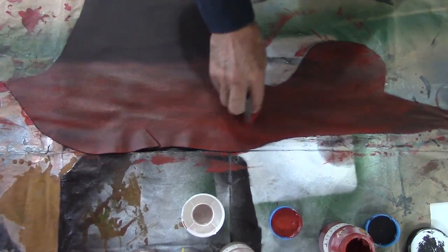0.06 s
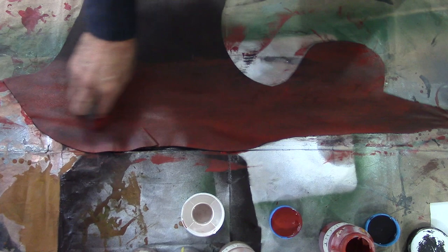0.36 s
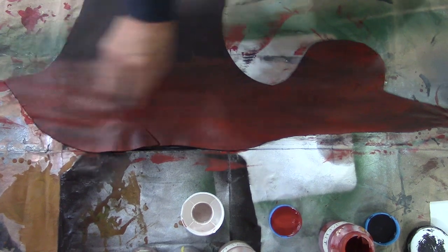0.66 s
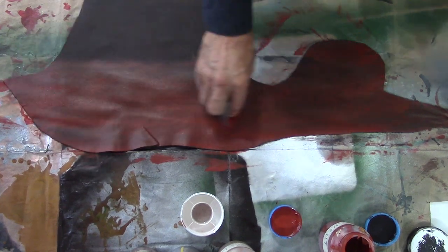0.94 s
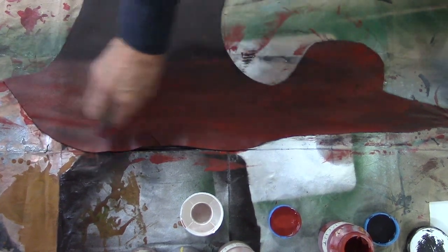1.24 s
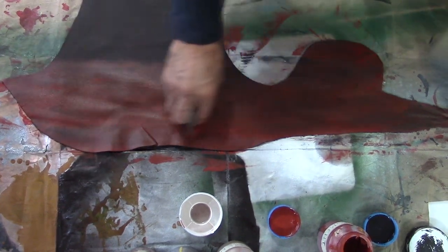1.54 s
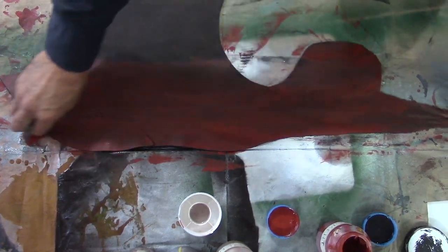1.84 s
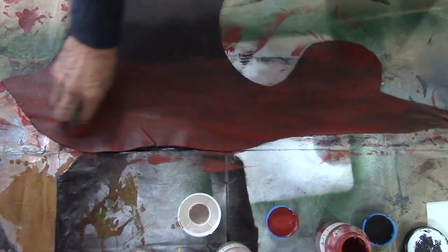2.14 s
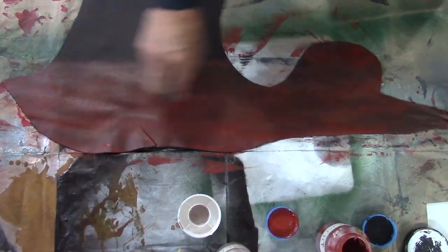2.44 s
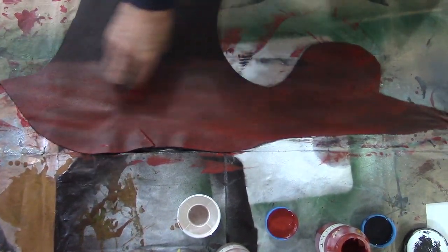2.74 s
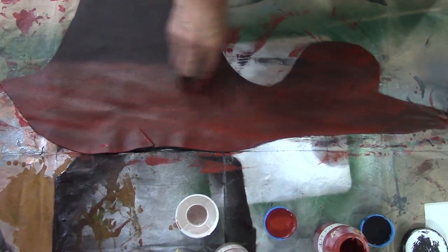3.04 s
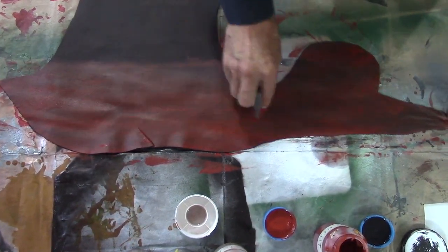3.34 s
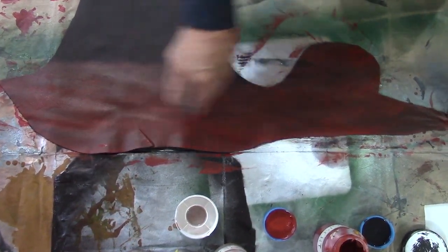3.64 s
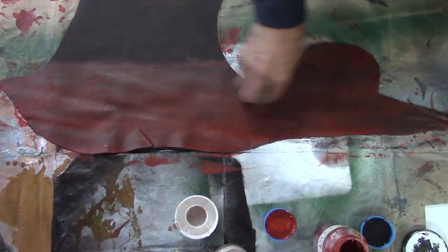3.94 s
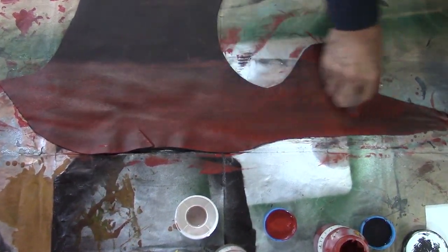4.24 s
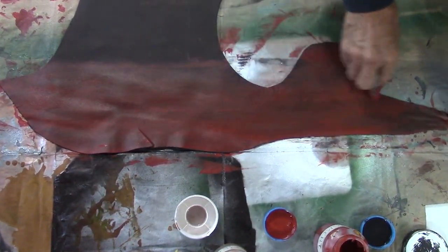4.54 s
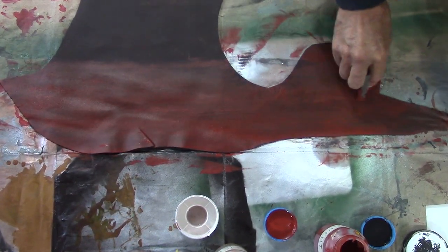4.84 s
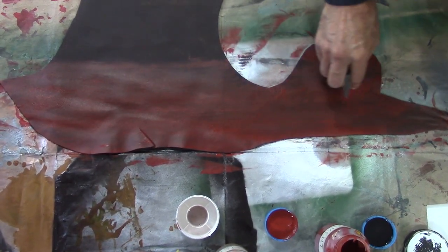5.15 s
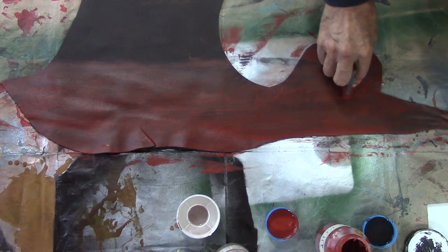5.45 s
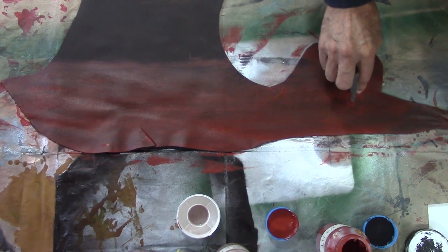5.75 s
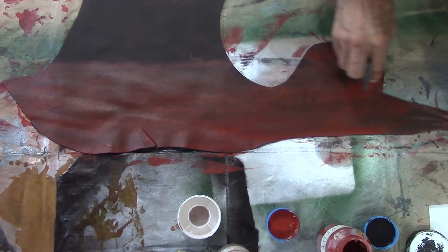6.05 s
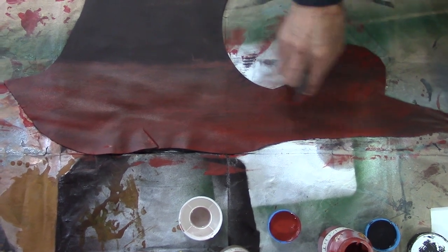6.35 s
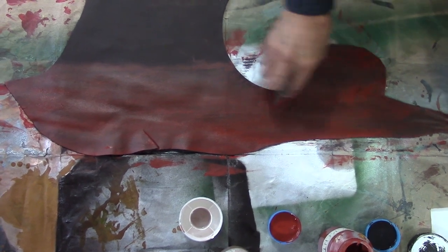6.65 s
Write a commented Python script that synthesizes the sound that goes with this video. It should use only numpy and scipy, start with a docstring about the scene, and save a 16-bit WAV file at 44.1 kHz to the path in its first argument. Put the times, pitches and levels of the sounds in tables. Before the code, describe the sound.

A pad rasps over leather in quick strokes, with small squeaks, a few sharp ticks and a hand thumping on a workbench.

```python
"""A hand rubs colour into a hide on a workbench, in a small workshop with quiet room noise.
First come long strokes: the pad rasps over the grain and squeaks where it drags hardest,
among one faint tick and two sharp ones. From 2 s the strokes are short, and hard landings of the
hand thump the bench and ring its modes. After 5 s the strokes pause for light fingertip scuffs
and fading thumps; two softer strokes and a faint tick follow after 6 s."""
import sys
import numpy as np
from scipy import signal
from scipy.fft import rfft, irfft
from scipy.io import wavfile

SR = 44100
rng = np.random.default_rng(int(sys.argv[2]) if len(sys.argv) > 2 else 0)


def unload_audio(sound):
    """Save the sound as a 16-bit wav file, at the path given as the first command line argument."""
    columns = np.transpose(np.atleast_2d(sound))
    # keep every value between -1 and 1, then stretch to whole-number steps
    steps = np.round(np.clip(columns, -1, 1) * 32767)
    wavfile.write(sys.argv[1], SR, steps.astype(np.int16))


N = 295029

# start_s, length_s, level_db, attack_s, from_pitch_hz, to_pitch_hz
STROKES = [ (0.082, 0.52, -44.5, 0.13, 2400, 3200), (0.513, 0.44, -60, 0.22, 2870, 2800),
           (0.876, 0.41, -44, 0.12, 2430, 2920), (1.458, 0.53, -44, 0.1, 2490, 3350),
           (2.124, 0.24, -43, 0.089, 2830, 2860), (2.601, 0.31, -42, 0.11, 2460, 2930),
           (3.06, 0.18, -38.5, 0.09, 2300, 2680), (3.422, 0.22, -41.5, 0.063, 2380, 2900),
           (3.868, 0.22, -42, 0.073, 3100, 2030), (4.244, 0.21, -42, 0.049, 3000, 2560),
           (4.58, 0.21, -43.5, 0.037, 3080, 2530), (4.881, 0.25, -49.5, 0.086, 2930, 2750),
           (6.176, 0.19, -45, 0.12, 2520, 2510), (6.557, 0.22, -48, 0.13, 2550, 2550), ]
# freq_hz, density_db
RASP_SPECTRUM = [(60, -62), (140, -23.5), (250, -9.5), (450, -9.5), (650, -15), (900, -9), (1250, -4),
                 (1700, -9.5), (2400, 1), (2950, -2.5), (3900, -0.5), (5200, -8), (7500, -32), (16000, -39)]
FIZZ_SPECTRUM = [(2500, -50), (4500, -11), (6000, -1.5), (8500, -2.5), (10500, -4.5), (12500, -10.5),
                 (14500, -20), (16000, -22)]
CHATTER_SPECTRUM = [(400, -55), (750, -2.5), (1050, -2), (1240, 1), (1400, 2), (1650, 3.5), (2200, -9),
                    (6000, -36)]


def rubbing(rasp_db=-3, pad_db=-3, chatter_db=-17, chatter_rise_db=13, fizz_db=-9, fizz_rise_db=3.0):
    """The pad rasps over the hide, ringing loosely; chatter and fizz grow as each stroke runs on."""
    t, out = np.arange(N) / SR, np.zeros(N)
    rasp = amp(rasp_db) * friction(RASP_SPECTRUM, grain_db=2.0, grain_hz=500) + amp(pad_db) * pad_ring()
    fizz = friction(FIZZ_SPECTRUM, grain_db=0.8, grain_hz=700)
    chatter = friction(CHATTER_SPECTRUM, grain_db=-1.0, grain_hz=150)
    for start_s, length_s, level_db, attack_s, _, _ in STROKES:
        on = (t >= start_s) & (t <= start_s + length_s)
        press = pressure(t[on] - start_s, length_s, attack_s)
        travel = np.cumsum(press) / press.sum()
        slip = press * (rasp[on] + amp(chatter_db + chatter_rise_db * travel) * chatter[on])
        # a light touch loses less fizz than rasp
        slip += press ** 0.79 * amp(fizz_db + fizz_rise_db * travel) * fizz[on]
        out[on] += amp(level_db) * slip
    uneven_pressure = amp(.5 * wander(rate_hz=50))
    return band(out, low_hz=130, high_hz=19000) * uneven_pressure


def pressure(t, length_s, attack_s, release_s=0.13, lean_db=2.5):
    """Stroke gain: the hand eases in, leans harder as it runs, then slows and lifts."""
    ease_in = np.sin(np.pi / 2 * np.minimum(t / attack_s, 1)) ** 2
    ease_off = np.clip((length_s - t) / release_s, 0, 1) ** 2
    return ease_in * ease_off * amp(lean_db * (t / length_s - .5))


def pad_ring(patches=3, drift_share=0.062, width_hz=930):
    """Patches of the pad each ring loosely about the pitch set by the grip."""
    grip_hz, ring = grip_pitch(), np.zeros(N)
    for _ in range(patches):
        slips = rng.standard_normal(N)
        patch_hz = grip_hz * (1 + drift_share * wander(rate_hz=23))
        ring += resonate(slips, patch_hz, width_hz)
    return unit_rms(ring)


def grip_pitch():
    """The pad's resonance glides linearly through each stroke as the grip turns."""
    t, pitch_hz = np.arange(N) / SR, np.zeros(N)
    for k, (start_s, length_s, _, _, from_hz, to_hz) in enumerate(STROKES):
        glide_hz = np.interp(t, [start_s, start_s + length_s], [from_hz, to_hz])
        pitch_hz = np.where((t >= start_s) | (k == 0), glide_hz, pitch_hz)
    return pitch_hz


def friction(spectrum, grain_db, grain_hz):
    """Countless tiny slips, bunched by the grain of the leather."""
    return colour(rng.standard_normal(N) * amp(grain_db * wander(grain_hz)), spectrum)


# start_s, level_db
HAND_LANDINGS = [(0.164, -40.5), (1.033, -45), (1.644, -54), (1.825, -49.5), (2.181, -28.5), (2.734, -46.5),
                 (3.121, -31.5), (3.477, -29), (3.926, -31), (4.297, -35), (4.624, -29), (4.939, -26.5),
                 (5.318, -28), (5.524, -38.5), (5.93, -57), (6.402, -53.5)]
# freq_hz, level_db, t60_s
BENCH_MODES = [(132.5, -32, 0.4), (179.5, -15, 0.17), (225.2, -19, 0.32), (274.4, -10.5, 0.42),
               (308, -10, 0.21), (327, -12, 0.45), (367, -19, 0.43), (405, 2.5, 0.056), (461.7, -3.5, 0.19),
               (498.3, -3.5, 0.11), (543.6, -5.5, 0.4), (586, -13, 0.3), (670.8, -12, 0.46),
               (833, -13.5, 0.15), (893.5, -6, 0.11), (953, -24, 0.14)]
# freq_hz, density_db
PUSH_SPECTRUM = [(60, -44), (140, -11), (250, 5), (480, 4), (720, 1), (900, -5), (1100, -9.5), (1300, -5.5),
                 (1900, -7.5), (3500, -25.5), (8000, -47)]
# delay_s, gain_db
SURFACE_ECHOES = [(0.0086, -2), (0.0321, -5)]


def thumps(ring_db=-8.5, push_db=-16, push_t60_s=0.22, rise_s=0.00023):
    """Each landing pushes the bench and rings its modes; near surfaces throw the thump back."""
    t, out = np.arange(SR // 2) / SR, np.zeros(N)
    # quarter-cycle offsets spread the blow over a few cycles
    ring = sum(amp(mode_db - 60 * t / t60_s) * np.sin(2 * np.pi * freq_hz * t - k * np.pi / 2)
               for k, (freq_hz, mode_db, t60_s) in enumerate(BENCH_MODES))
    direct_path = (0.000082, 0.0041)
    for start_s, level_db in HAND_LANDINGS:
        push = burst(t, PUSH_SPECTRUM, push_db, push_t60_s)
        thump = amp(level_db) * (amp(ring_db) * ring + push) * (1 - np.exp(-t / rise_s))
        for delay_s, gain_db in [direct_path] + SURFACE_ECHOES:
            add(out, start_s + delay_s, amp(gain_db) * thump)
    return band(out, low_hz=169, high_hz=6000)  # the thumps carry little deep bass


# start_s, level_db, pitch_hz, treble_db, rattle_db, crack_db
TICKS = [(0.1213, -46, 1370, -7, -7.5, -8), (0.473, -24.5, 1560, -2, -11, -3),
         (0.7427, -33.5, 1470, 3.5, -20, -12), (6.302, -45, 914, -7, -21, -15)]
# pitch_ratio, level_db, t60_s
TICK_MODES = [(.72, -5.5, 0.02), (1, 1, 0.027), (1.25, 9.5, 0.0029), (2.04, 1.5, 0.011),
              (2.66, -1.5, 0.0094), (3.7, -8, 0.0043), (5.3, -20, 0.011)]
# freq_hz, density_db
RATTLE_SPECTRUM = [(150, -35), (600, -9), (1000, -2), (1600, 0), (2300, -12), (5000, -22), (16000, -45)]
CONTACT_SPECTRUM = [(60, -50), (300, -21), (1200, -6.5), (2600, -1.5), (5000, -8.5), (10000, -8),
                    (13000, -18), (16000, -34)]  # shared with scuffs


def ticks(rattle_t60_s=0.23, crack_t60_s=0.013):
    """Hard snaps on the hide: a crack, a very short ring and a dying rattle."""
    t, out = np.arange(SR // 4) / SR, np.zeros(N)
    for start_s, level_db, pitch_hz, treble_db, rattle_db, crack_db in TICKS:
        ring = np.zeros(len(t))
        for k, (ratio, mode_db, t60_s) in enumerate(TICK_MODES):
            envelope = amp(mode_db + treble_db * (k > 2) - 60 * t / t60_s)
            ring += (-1) ** k * envelope * np.sin(2 * np.pi * pitch_hz * ratio * t)
        rattle = burst(t, RATTLE_SPECTRUM, rattle_db, rattle_t60_s)
        crack = burst(t, CONTACT_SPECTRUM, crack_db, crack_t60_s)
        add(out, start_s, amp(level_db) * (ring + rattle + crack))
    return band(out, low_hz=610, high_hz=10000)


# start_s, level_db, length_s, pitch_hz
PAD_SQUEAKS = [(0.336, -50, 0.057, 1124), (0.404, -42.5, 0.035, 1254), (1.041, -42, 0.068, 1254),
               (1.083, -46, 0.069, 1155), (1.745, -49.5, 0.085, 1150), (2.77, -52, 0.07, 1300)]


def squeaks(width_hz=260):
    """Short, hoarse stick-slip tones where the pad drags hardest."""
    out = np.zeros(N)
    for start_s, level_db, length_s, pitch_hz in PAD_SQUEAKS:
        swell = signal.windows.tukey(int(length_s * SR), .7)
        tone = resonate(rng.standard_normal(len(swell)), pitch_hz, width_hz)
        add(out, start_s, amp(level_db) * swell * tone)
    return out


# start_s, level_db, length_s
FINGER_SCUFFS = [(1.461, -56.5, 0.017), (1.861, -40.5, 0.068), (2.26, -45.5, 0.039), (3.66, -70, 0.21),
                 (4.082, -63.5, 0.25), (4.871, -56.5, 0.03), (5.271, -55, 0.069), (5.344, -60.5, 0.081),
                 (5.478, -57.5, 0.057), (5.535, -62.5, 0.043), (5.647, -58, 0.041), (5.695, -61.5, 0.062),
                 (5.834, -56, 0.034), (5.875, -60, 0.055)]


def scuffs(peak_share=0.3):
    """Fingertips brush the hide: friction that swells quickly and fades."""
    envelope = np.zeros(N)
    for start_s, level_db, length_s in FINGER_SCUFFS:
        age = np.arange(int(3 * length_s * SR)) / (length_s * SR * peak_share)  # 1 at the peak
        add(envelope, start_s, amp(level_db) * (age * np.exp(1 - age)) ** 2)
    return envelope * friction(CONTACT_SPECTRUM, grain_db=0.0, grain_hz=600)


# freq_hz, t60_s
ROOM_DECAY = [(200, 0.63), (550, 0.16), (1500, 0.17), (5000, 0.37), (14000, 0.056)]


def workshop_reverb(x, taps_per_s=2500, predelay_s=0.006):
    """Sparse reflections of random sign, each band dying at its own rate."""
    taps = rng.choice([-1., 1.], SR // 2) * (rng.random(SR // 2) < taps_per_s / SR)
    taps[:int(predelay_s * SR)] = 0
    freq_hz, t, bands = signal.stft(taps, SR, nperseg=256)
    decay = amp(-60 * t / lookup(ROOM_DECAY, freq_hz)[:, None])
    _, tail = signal.istft(bands * decay, SR, nperseg=256)
    return signal.fftconvolve(x, tail / np.linalg.norm(tail))[:N]


# freq_hz, density_db
ROOM_NOISE_SPECTRUM = [(15, -49), (25, -25.5), (134, -14.5), (439, -1), (607, -1), (796, -3), (887, -2.5),
                       (1070, -4.5), (1290, -5), (1890, -8), (2220, -11), (2690, -11), (10700, -20.5),
                       (14800, -27.5), (16000, -31)]


def room_noise(level_db=-61.5, sway_db=0.4):
    """Quiet broadband noise with a slight sway in level."""
    noise = colour(rng.standard_normal(N), ROOM_NOISE_SPECTRUM)
    return amp(level_db) * noise * amp(sway_db * wander(rate_hz=6.8))


def amp(db):
    """Decibels to gain."""
    return 10 ** (np.asarray(db) / 20)


def unit_rms(x):
    """Scales to rms 1."""
    return x / np.sqrt(np.mean(x ** 2) + 1e-20)


def lookup(table, freq_hz):
    """Interpolates a table on a log-frequency axis."""
    table_hz, values = np.transpose(table)
    return np.interp(np.log(freq_hz + 1), np.log(table_hz + 1), values)


def add(mix, start_s, sound):
    """Mixes a sound in at start_s."""
    part = mix[max(round(start_s * SR), 0):][:len(sound)]
    part += sound[:len(part)]


def colour(x, spectrum):
    """Filters x by a spectrum; rms 1."""
    gain = amp(lookup(spectrum, np.fft.rfftfreq(len(x), 1 / SR)))
    return unit_rms(irfft(rfft(x) * gain, len(x)))


def burst(t, spectrum, level_db, t60_s):
    """Coloured noise with exponential decay."""
    return colour(rng.standard_normal(len(t)), spectrum) * amp(level_db - 60 * t / t60_s)


def wander(rate_hz):
    """Smooth random curve, rolled off above rate_hz; rms 1."""
    freq_hz = np.fft.rfftfreq(N, 1 / SR)
    return unit_rms(irfft(rfft(rng.standard_normal(N)) / (1 + (freq_hz / rate_hz) ** 4), N))


def resonate(x, pitch_hz, width_hz):
    """Resonance at a fixed or moving pitch; rms 1."""
    carrier = np.exp(2j * np.pi * np.cumsum(pitch_hz * np.ones(len(x))) / SR)
    pole = np.exp(-np.pi * width_hz / SR)
    baseband = signal.lfilter([1], [1, -2 * pole, pole * pole], x / carrier)
    return unit_rms((carrier * baseband).real)


def band(x, low_hz, high_hz):
    """Causal band-pass with soft edges."""
    sos = signal.butter(2, [low_hz, min(high_hz, .45 * SR)], "band", fs=SR, output="sos")
    return signal.sosfilt(sos, x)


def scene():
    """All centred except a faint low rumble, different in each channel."""
    rub, bench, snaps = rubbing() + squeaks() + scuffs(), thumps(), ticks()
    reverb = workshop_reverb(amp(-15) * rub + amp(-20) * bench + amp(-24) * snaps)
    background = room_noise()
    low_rumble = amp(-76.0) * band(rng.standard_normal((2, N)), low_hz=15, high_hz=160)
    return rub + bench + snaps + reverb + background + low_rumble


def record(dry, cutoff_hz=15900):
    """Steep linear-phase low-pass."""
    lowpass = signal.firwin(511, cutoff_hz, window=("kaiser", 9), fs=SR)
    return signal.oaconvolve(dry, lowpass[None], "same")


dry = scene()
out = record(dry)
unload_audio(out)
```